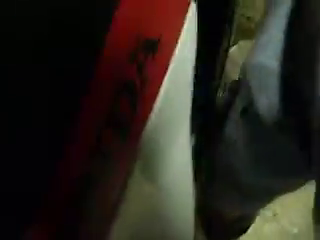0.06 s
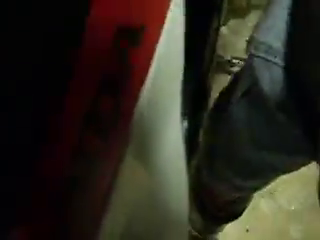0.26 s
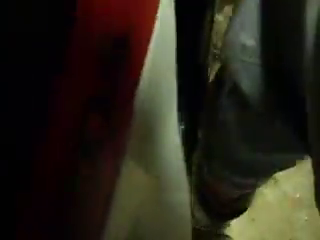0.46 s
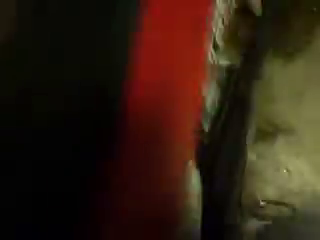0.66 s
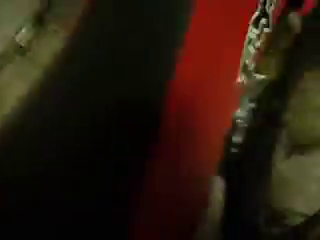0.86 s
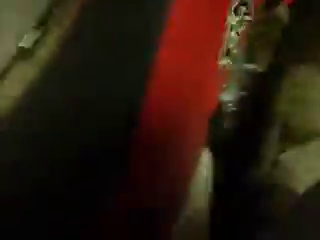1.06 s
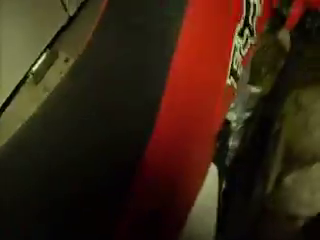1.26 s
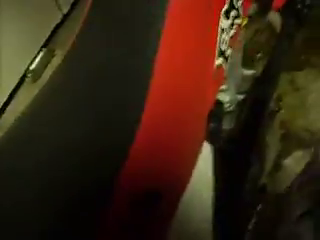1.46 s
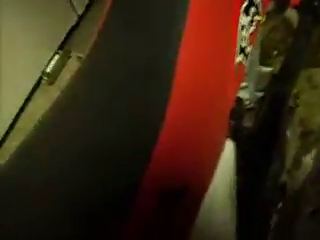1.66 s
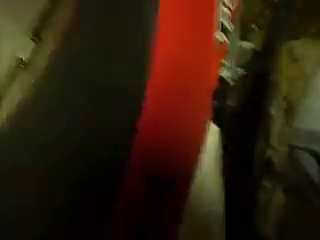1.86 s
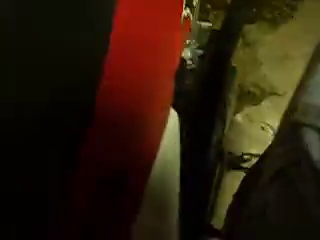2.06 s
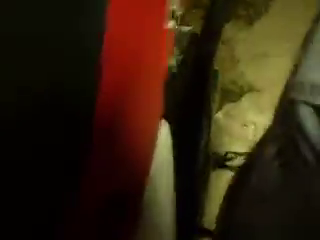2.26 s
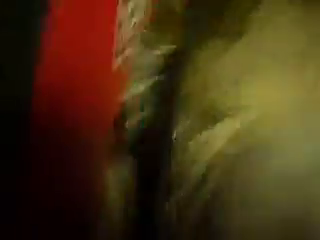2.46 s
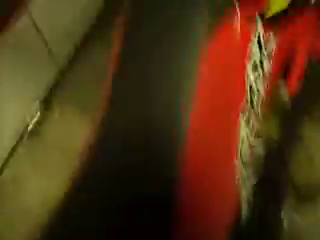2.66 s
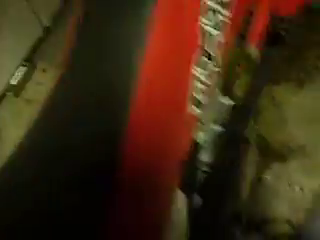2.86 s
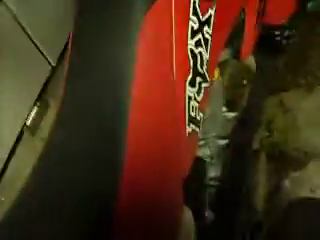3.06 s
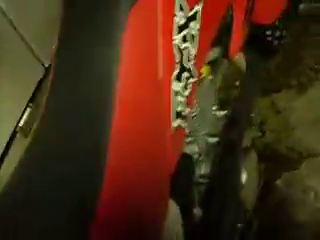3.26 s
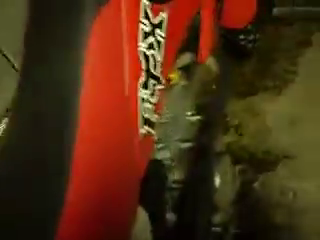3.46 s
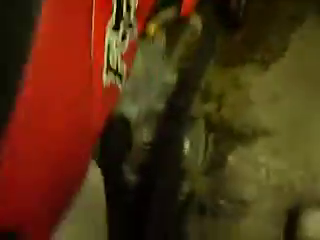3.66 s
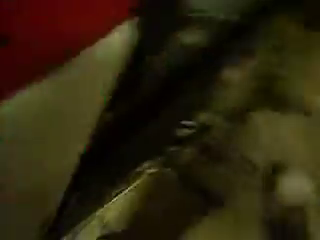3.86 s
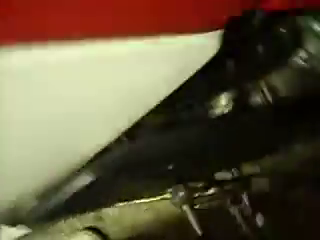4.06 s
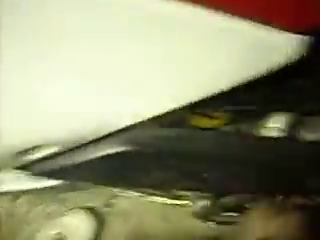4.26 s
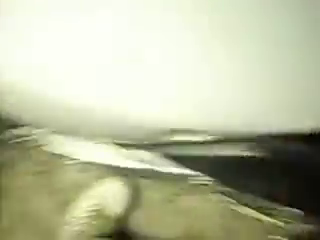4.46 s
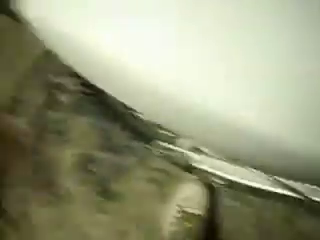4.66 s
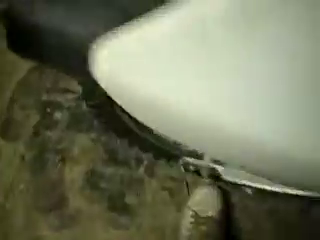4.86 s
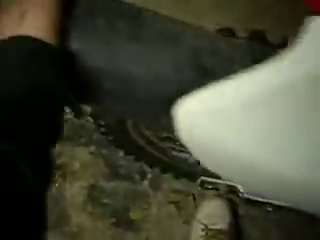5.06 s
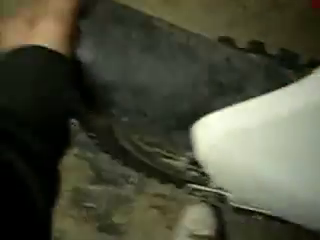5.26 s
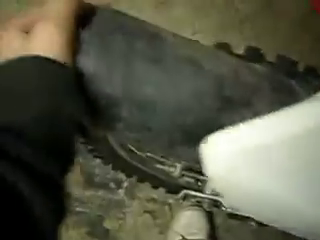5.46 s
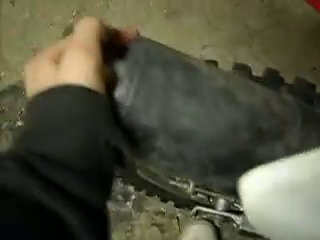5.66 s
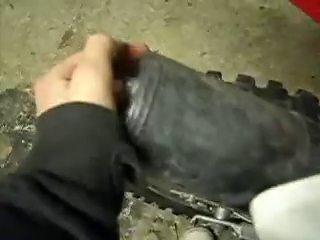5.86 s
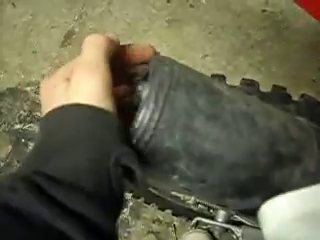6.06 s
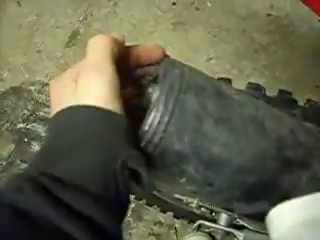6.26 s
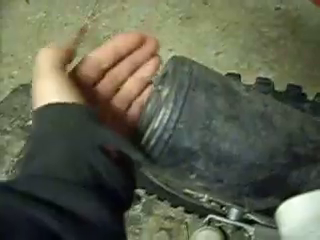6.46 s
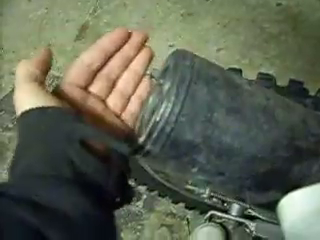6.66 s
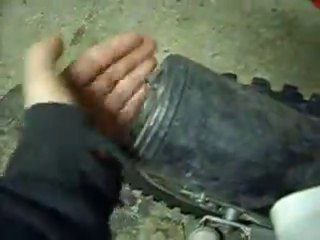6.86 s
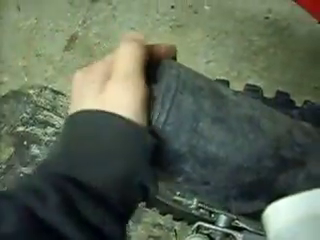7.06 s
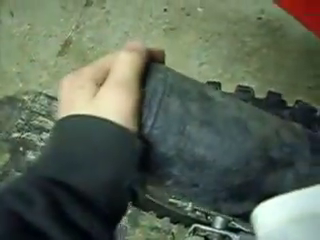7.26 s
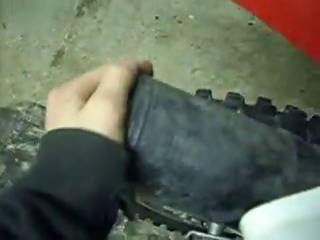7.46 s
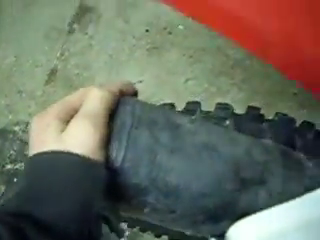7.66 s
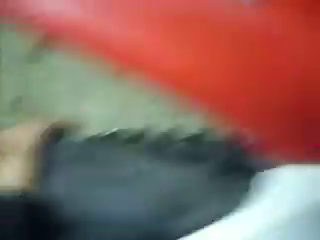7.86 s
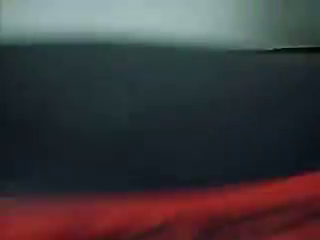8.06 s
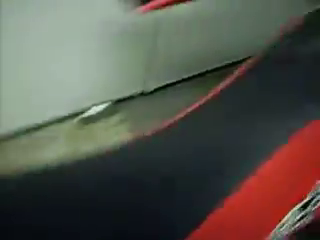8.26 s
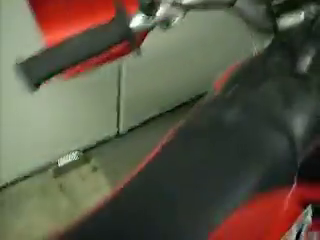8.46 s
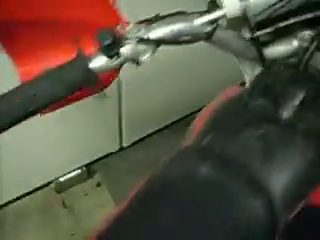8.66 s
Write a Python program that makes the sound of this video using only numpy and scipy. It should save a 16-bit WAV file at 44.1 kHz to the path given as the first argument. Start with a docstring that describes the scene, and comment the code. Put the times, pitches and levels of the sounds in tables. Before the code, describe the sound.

A kick lever scrapes and slams, a second kick catches, and a small single-cylinder dirt bike settles into a thumping idle in a closed garage.

```python
"""A small single-cylinder dirt bike is kicked into life in a closed garage, over room noise and a faint whine.
Small knocks and a hiss come first; the first kick scrapes the gears, puffs air and slams the lever on its stop.
The second kick catches: resonators ring at each exhaust pulse, noise bursts make gas rush and piston knock,
the starter ratchet rasps, and the engine picks up to about ten firings a second.
The microphone then moves from the seat to the silencer, where it crackles and flattens tall peaks, and back."""
import sys
import numpy as np
from scipy import signal
from scipy.fft import rfft, irfft, next_fast_len
from scipy.io import wavfile
from scipy.ndimage import uniform_filter1d

SR = 44100
rng = np.random.default_rng(int(sys.argv[2]) if len(sys.argv) > 2 else 0)


def store_pcm(level_fs):
    """Save levels as 16-bit WAV."""
    pcm = np.round(np.clip(level_fs, -1, 1) * 32767).astype(np.int16)
    wavfile.write(sys.argv[1], SR, np.atleast_2d(pcm).T)


N = 384552
TIME = np.arange(N) / SR
CATCH_S = 2.6535  # the engine starts firing


def from_db(db):
    """Turn decibels into a gain."""
    return 10 ** (np.asarray(db) / 20)


def rms_one(x):
    """Scale to rms 1."""
    return x / np.sqrt(np.mean(x ** 2) + 1e-20)


def curve(rows):
    """Join (time [s], value) rows by straight lines."""
    return np.interp(TIME, *np.transpose(rows))


def swell(start, end, rise_s, t60):
    """Rise from the start, hold until the end, die away."""
    rise = np.clip((TIME - start) / rise_s, 0, 1)
    return rise * from_db(-60 * np.clip((TIME - end) / t60, 0, 3))


def clicks(times, sizes):
    """Place one click of the given size at each time."""
    places = np.round(np.asarray(times) * SR).astype(int)
    return np.bincount(np.clip(places, 0, N - 1), sizes, N)


def grains(per_s, spread_db):
    """Scatter random clicks of uneven size."""
    sizes = rng.standard_normal(N) * from_db(spread_db * rng.standard_normal(N))
    return (rng.random(N) < per_s / SR) * sizes


def ring(x, hz, t60):
    """Let a unit click start a dying cosine of height 1; at 0 Hz a plain decay."""
    r = from_db(-60 / (t60 * SR))
    c = np.cos(2 * np.pi * hz / SR)
    return signal.lfilter([1, -r * c], [1, -2 * r * c, r * r], x + 1e-18)


def resonate(x, peaks):
    """Ring parallel resonances (Hz, width Hz, dB), scaled so that white noise keeps its level."""
    out, power = 0, 0
    for k, (hz, width, db) in enumerate(peaks):
        r = np.exp(-np.pi * width / SR)
        poles = [1, -2 * r * np.cos(2 * np.pi * hz / SR), r * r]
        band = (1 - r * r) / 2 * signal.lfilter([1, 0, -1], poles, x + 1e-18)
        out = out + (-1) ** k * from_db(db) * band  # alternate signs
        power += from_db(db) ** 2 * (1 - r * r) / 2
    return out / np.sqrt(power)


def colour(x, spectrum):
    """Give a steady white signal a spectrum that closes at both ends; rms 1."""
    size = next_fast_len(N, True)
    hz = np.maximum(np.fft.rfftfreq(size, 1 / SR), 1)
    points, db = np.transpose(spectrum)
    gain = from_db(np.interp(np.log(hz), np.log(points), db))
    gain = gain / (1 + (points[0] / hz / 2) ** 4) / (1 + (hz / points[-1] / 2) ** 4)
    return rms_one(irfft(rfft(x, size) * gain, size)[:N])


def noise(spectrum):
    """Make coloured noise of rms 1."""
    return colour(rng.standard_normal(N), spectrum)


def garage(x, wet_db):
    """Add dense, dying reflections from bare walls, starting a few milliseconds late."""
    garage_t60_s = 0.42
    t = TIME[:SR // 2]
    tail = rng.standard_normal(len(t)) * from_db(-60 * t / garage_t60_s) * (t > .004)
    reflections = signal.oaconvolve(x, tail / np.sqrt(np.sum(tail ** 2)))[:N]
    return x + from_db(wet_db) * reflections


# Spectrum of the quiet garage: (frequency [Hz], relative level [dB])
QUIET_COLOUR = [(15, -35), (25, 5), (84, -1.5), (118, -1.5), (169, -5.5), (259, -4.5), (1880, -23),
                (2620, -25.5), (3330, -29.5), (6820, -32.5), (7500, -48), (9750, -70), (16500, -120)]


def quiet_garage():
    """Steady low-weighted noise under a faint, high sine whine."""
    whine = from_db(-78) * np.sin(2 * np.pi * 6650 * TIME)
    return from_db(-54) * noise(QUIET_COLOUR) + whine


# Small knocks of boot, pedal and bodywork: (time [s], level [dB], pitch [Hz], t60 [s])
KNOCKS = [(0.02, -44.5, 130, 0.4), (0.022, -35, 478, 0.13), (.549, -42, 2370, 0.014),
          (.607, -35, 780, 0.043), (0.63, -27.5, 170, 0.11), (0.648, -32.5, 1230, 0.051),
          (0.653, -30, 308, 0.1), (0.942, -18.5, 195, 0.078), (0.956, -27.5, 360, 0.23),
          (1.186, -40, 680, 0.036), (1.64, -46.5, 700, 0.035), (1.786, -46, 257, 0.074),
          (2.453, -39, 450, 0.11), (2.459, -33.5, 99, 0.18), (2.499, -32, 3000, 0.0088),
          (2.614, -39, 1500, .02), (3.136, -34, 3800, 0.0065), (5.036, -31, 3420, 0.0033),
          (5.407, -32, 2300, 0.0048)]


def knocks():
    """Short dull contacts: each is a dying burst of noise in a broad band round its pitch."""
    spread = .27  # band edges lie at pitch / (1 + spread) and pitch * (1 + spread)
    out, t = np.zeros(N), TIME[:SR // 4]
    for s, db, hz, t60 in KNOCKS:
        edges = [hz / (1 + spread), hz * (1 + spread)]
        band = signal.butter(2, edges, "band", fs=SR, output="sos")
        settled = rms_one(signal.sosfilt(band, rng.standard_normal(SR // 2)))[-len(t):]
        attack = np.minimum(t * hz * 2, 1)  # half a period
        start = round(s * SR)
        out[start:start + len(t)] += settled * from_db(db - 60 * t / t60) * attack
    return garage(out, wet_db=-6.0)


# Spectrum shared by the hiss and the valve ticks: (frequency [Hz], relative level [dB])
HISS_COLOUR = [(1000, 10.5), (1900, -3), (2700, 8), (3500, -0.5), (5600, 4), (6500, -7.5), (7400, -24)]
# The hiss comes and goes: (start [s], end of hold [s], level [dB])
HISSES = [(.135, 0.199, -55.5), (.568, 1.198, -53.5), (2.387, 3.045, -53)]


def passing_hiss():
    """Coloured noise that swells quickly, holds and dies away."""
    level = sum(from_db(db) * swell(start, end, 0.0059, 0.15) for start, end, db in HISSES)
    return level * noise(HISS_COLOUR)


# Spectrum of the dragged gears: (frequency [Hz], relative level [dB])
SCRAPE_COLOUR = [(40, 16), (100, 6), (330, -0.5), (600, -9), (1100, -8), (1800, -41), (5000, -39.5)]
# The kicks drag the gears round: (start [s], end of stroke [s], level [dB])
KICKS = [(0.568, 0.962, -32.5), (2.375, 2.66, -34)]


def gear_scrape():
    """Under each stroke the gears grind: coloured random grains rise with the kick and run down after it."""
    strokes = sum(from_db(db) * swell(start, end, rise_s=0.24, t60=0.64) for start, end, db in KICKS)
    return strokes * colour(grains(per_s=1200, spread_db=2.0), SCRAPE_COLOUR)


def slug(pulses, width_s):
    """Shape each slug of gas as a pressure peak flanked by suction."""
    u = np.arange(-SR // 100, SR // 100 + 1) / (width_s * SR)
    shape = (1 - 3 * u ** 2) / (1 + u ** 2) ** 3 / (width_s * SR)
    return signal.oaconvolve(pulses, shape, "same")


# Air pumped out without firing: (time [s], level into the standing waves [dB])
PUFFS = [(0.76, -25.5), (1.009, -26), (2.555, -33), (2.654, -24)]
# Standing waves of pipe and garage; the exhaust scales the t60 for each place:
# (frequency [Hz], t60 [s], level at the seat [dB], level at the silencer [dB])
BOOM = [(56.7, 0.16, -23, 3.5), (82.3, 0.26, -9, 7), (85.84, 0.35, 6.5, 2), (142.6, 0.2, -7.5, 4.5),
        (170.5, 0.38, -6.5, 1.5), (195.8, 0.21, -4, -7.5), (244.1, 0.22, -5, 3), (277.5, 0.14, 6.5, 2.5),
        (312.3, 0.24, 6.5, 0), (379.6, .2, -7.5, -2.5), (416.6, 0.19, 1.5, -8.5), (467.6, 0.26, -2.5, 1.5),
        (511.6, 0.1, 4, 4), (572, 0.092, 0, -14.5)]


def pumped_air():
    """The turned engine pushes out soft, wide slugs of air that ring the standing waves, heard at the seat."""
    times, db = np.transpose(PUFFS)
    puffs = clicks(times, from_db(db))
    pumped = sum(from_db(seat_db) * ring(puffs, hz, t60) for hz, t60, seat_db, _ in BOOM)
    return slug(pumped, width_s=0.0056)


# Spectrum of the crash: (frequency [Hz], relative level [dB])
CRASH_COLOUR = [(90, 11), (200, 19), (420, 19), (650, 7), (1000, 1.5), (1800, 0.5), (2900, 1), (4200, -6),
                (6000, -5.5), (7300, -23)]
# Modes of frame and lever: (frequency [Hz], relative level [dB], t60 [s])
FRAME = [(89.5, -9, 0.18), (190, -10, 0.12), (372, 2.5, 0.28), (464, 4, 0.13), (870, -8.5, 0.17),
         (1186, -12, 0.15), (1640, -32, .2), (2010, -18, .1), (2840, -16, 0.19), (3350, -26, .07)]
# The lever hits its stop and rattles: (time [s], strength of the blow [dB])
LEVER = [(0.783, -17.5), (0.8, -38), (.858, -47.5), (0.888, -38.5)]


def lever_crash():
    """Each blow rings the frame modes and sets off noise with a fast and a slow decay."""
    times, db = np.transpose(LEVER)
    blows = clicks(times, from_db(db))
    frame = 0
    for k, (hz, mode_db, t60) in enumerate(FRAME):
        frame = frame + (-1) ** k * from_db(mode_db) * ring(blows, hz, t60)
    decay = from_db(4.0) * ring(blows, 0, 0.049) + from_db(-4.5) * ring(blows, 0, 0.37)
    return from_db(-5.0) * frame + noise(CRASH_COLOUR) * decay


# Engine speed before any drag; it picks up, then hunts: (time [s], speed [firings per s])
SPEED = [(2.65, 7.81), (3.14, 7.84), (3.22, 8.9), (3.77, 9.39), (3.83, 9.98), (4.57, 9.99), (4.82, 9.49),
         (4.95, 10.38), (5.58, 10.4), (6.22, 9.94), (6.53, 9.22), (6.87, 10.66), (7.71, 9.84),
         (7.81, 10.77), (7.98, 10.03)]
# Uneven, mostly weak burns, after which the crank drags:
# (time [s], share lost [cycles], weakening of the pulse [dB], negative is stronger)
STUMBLES = [(2.66, .43, 5), (3.33, 0.073, 2), (4.58, .05, -0.1), (5.18, 0.075, 1.5), (5.67, 0.081, 1.5),
            (6.48, 0.078, 1.5), (6.89, .06, -0.5), (7.87, 0.11, 5.5), (8.18, .07, 0.8)]


def crank():
    """Count engine cycles since the catch; each uneven burn costs part of a cycle."""
    drag_s = .07
    turned = np.cumsum(curve(SPEED)) / SR
    dragged = sum(lost * np.clip((TIME - s) / drag_s, 0, 1) for s, lost, _ in STUMBLES)
    return turned - np.interp(CATCH_S, TIME, turned) - dragged


# Strength of the exhaust pulses before the uneven burns: (time [s], level [dB])
PULSE = [(2.65, -19.5), (3.15, -16.5), (4.55, -12), (4.95, -9.0), (6.0, -8.5), (6.95, -10), (7.25, -13.5),
         (7.57, -14), (7.68, -10.5), (7.97, -11), (8.1, -13.5), (8.72, -16.0)]


def fire(cycles, near):
    """Fire once per cycle: times, exhaust pulse dB, and gas rush dB that follows it and grows near the silencer."""
    times = np.interp(np.arange(int(cycles[-1]) + 1), cycles, TIME)
    pulse_db = np.interp(times, *np.transpose(PULSE))
    for s, _, weaker_db in STUMBLES:
        pulse_db[np.argmin(np.abs(times - s))] -= weaker_db
    closeness = np.interp(times, TIME, near) ** 0.75
    uneven_db = 1.13 * rng.standard_normal(len(times))
    rush_db = pulse_db - 35.5 + 9 * closeness + uneven_db
    return times, pulse_db, rush_db


# Crankcase and cylinder resonances: (frequency [Hz], width [Hz], relative level [dB])
CASE = [(770, 130, 8), (1155, 91, -1), (2070, 68, -3.5), (2880, 440, -11.5), (6050, 200, -39)]


def piston_knock(times):
    """The piston knocks at each ignition, before the exhaust pulse: a noise burst rings the crankcase."""
    lead_s, knock_t60 = 0.018, 0.053
    sizes = from_db(rng.normal(0, 1.5, len(times)))
    bursts = ring(clicks(times - lead_s, sizes), 0, knock_t60) * rng.standard_normal(N)
    return resonate(bursts, CASE)


def valve_ticks(times):
    """A valve ticks a little over a quarter of the way through each cycle: a very short noise burst."""
    sizes = from_db(rng.normal(0, 1.5, len(times) - 1))
    ticks = clicks(times[:-1] + .28 * np.diff(times), sizes)
    return ring(ticks, 0, 0.01) * noise(HISS_COLOUR)


# Spectrum of the running chain and gears: (frequency [Hz], relative level [dB])
WHIRR_COLOUR = [(150, 18), (400, 31), (750, 16.5), (1200, 11), (1450, -3.5), (1900, 1), (2200, -3),
                (2900, -2), (4000, 1), (5300, -4), (6000, 0), (7200, -15)]
# Engine cases, rung by the cam chain: (frequency [Hz], width [Hz], relative level [dB])
CHAIN = [(1190, 60, -3.5), (2160, 48, 3), (2500, 70, -3.5), (3200, 130, -10.5), (6150, 350, -4)]


def cam_chain(times):
    """Dense grains whirr steadily; each power stroke snaps the chain tight and its grains ring the cases."""
    whirr = colour(grains(per_s=4600, spread_db=0.5), WHIRR_COLOUR)
    tension = ring(clicks(times, from_db(rng.normal(0, 1.5, len(times)))), 0, 0.34)
    chain = resonate(tension * grains(per_s=2100, spread_db=3.0), CHAIN)
    return from_db(-1) * (whirr + chain)


def engine_case(times, near):
    """Mix piston, valves and cam chain, loudest at the seat and shielded at the rear."""
    spin_up_s = 0.041  # full level is reached at the catch
    clatter = from_db(-0.5) * piston_knock(times) + from_db(1.0) * valve_ticks(times)
    spin_up = np.clip(1 + (TIME - CATCH_S) / spin_up_s, 0, 1)
    running = spin_up * from_db(-39.5 - 7.5 * near ** 2.9)
    return running * (cam_chain(times) + garage(clatter, wet_db=0.0))


# Spectrum of the gas rush: (frequency [Hz], relative level [dB])
RUSH_COLOUR = [(300, 14.5), (550, 17), (720, 7.5), (900, 8), (1250, 10.5), (1450, -1.5), (1900, 0.5),
               (2300, 4), (3300, -1), (4800, -1), (6100, 6), (7300, -15)]
# Throat of the pipe, voiced by turbulent gas: (frequency [Hz], width [Hz], relative level [dB])
THROAT = [(355, 56, 2.5), (518.5, 59, 1.5), (595, 82, -8), (820, 200, -18.5), (1164, 88, -13),
          (1246, 73, -18)]
# Sheet metal of the silencer, buzzing at each pulse: (frequency [Hz], width [Hz], relative level [dB])
SHELL = [(1160, 48, -2), (2206, 110, 6), (2398, 140, 8.5), (2800, 780, -1), (6280, 150, 3.5)]
# Crackle of the overloaded microphone at the front of each pulse:
# (frequency [Hz], width [Hz], relative level [dB])
CRACKLE = [(2440, 240, -1), (6330, 400, 0)]


def gas_rush(firings, near):
    """As the valve opens turbulent gas rushes, the microphone crackles, the shell buzzes and the throat barks."""
    times, pulse_db, rush_db = firings
    valve_lead_s, crackle_lead_s = 0.0038, 0.0027  # ahead of the exhaust pulse
    opening = uniform_filter1d(clicks(times - valve_lead_s, from_db(rush_db)), size=64)
    rush = ring(opening, 0, 0.2) * noise(RUSH_COLOUR) * from_db(8.0 - 5.56 * near)
    flow = ring(uniform_filter1d(clicks(times, from_db(pulse_db)), size=128), 0, 0.21)
    bark = flow * resonate(rng.standard_normal(N), THROAT) * from_db(-12.5 - 6 * near)
    # buzz and crackle are sharp only from close by
    shaken = ring(opening, 0, 0.087) * rng.standard_normal(N)
    buzz = resonate(shaken, SHELL) * from_db(-3.5 + 10.1 * near)
    front = ring(clicks(times - crackle_lead_s, from_db(rush_db)), 0, 0.0075)
    crackle = resonate(front * rng.standard_normal(N), CRACKLE) * from_db(-2 + 9.8 * near)
    return rush + bark + garage(buzz + crackle, wet_db=-19.5)


def exhaust(firings, near):
    """Pulses ring pipe and garage; at the seat the upper waves arrive later and all of them last longer."""
    times, pulse_db, _ = firings
    seat_ring, silencer_ring = 1.21, 0.8  # factors on the t60
    place = np.interp(times, TIME, near)
    boom, late_s = 0, 0
    for hz, t60, seat_db, silencer_db in BOOM:
        # no two burns are alike, least of all in the high modes
        uneven_db = 3.5 * np.sqrt(hz / BOOM[-1][0]) * rng.standard_normal(len(times))
        sizes = from_db(pulse_db + uneven_db)
        late_s += 0.002173 * (hz > 300)  # short waves come round by the walls, each mode later
        # at the seat the upper modes follow the strength of the burn more than in proportion
        hard_db = 0.82 * (pulse_db + 15) * (hz > 220)
        at_seat = clicks(times + late_s, sizes * (1 - place) * from_db(seat_db + hard_db))
        at_silencer = clicks(times + late_s / 2, sizes * place * from_db(silencer_db))
        boom = boom + ring(at_seat, hz, t60 * seat_ring) + ring(at_silencer, hz, t60 * silencer_ring)
    # close to the outlet the slug itself is heard, before any ringing
    direct = slug(clicks(times, place * from_db(pulse_db - 48) * SR), width_s=0.003)
    return slug(boom, width_s=0.0023) + direct


# Spectrum of the ratchet: (frequency [Hz], relative level [dB])
RASP_COLOUR = [(700, 9), (1600, -1), (2500, 4.5), (3500, 0.5), (4700, 3), (6300, -2.5), (7400, -24)]


def starter_ratchet(cycles):
    """The ratchet runs over the gear from the catch until the lever comes back; each tooth snaps, then fades."""
    lever_back_s, teeth_per_cycle, tooth_depth_db = 3.0, 7, 12
    tooth_db = tooth_depth_db * (1.0 - cycles * teeth_per_cycle % 1)
    level = swell(CATCH_S, lever_back_s, rise_s=0.0044, t60=0.098) * from_db(-49.5 + tooth_db)
    rasp = level * colour(grains(per_s=4700, spread_db=2.5), RASP_COLOUR)
    return garage(rasp, wet_db=-6)


# Path of the microphone: (time [s], place [0 at the seat .. 1 at the silencer])
PLACE = [(2.65, 0.0086), (4.35, 0.05), (4.72, 0.62), (5.0, 0.79), (6.9, 0.98), (7.4, 0.73), (7.9, 0.72),
         (8.35, 0.072)]


def scene():
    """Mix the quiet garage, the kicks and the running engine into one channel."""
    near = np.clip(curve(PLACE), 0, 1)
    cycles = crank()
    firings = fire(cycles, near)
    background = quiet_garage() + knocks() + passing_hiss()
    kicks = gear_scrape() + lever_crash() + starter_ratchet(cycles)
    # the garage is heard less from close to the silencer
    pipe = garage(pumped_air() + exhaust(firings, near), wet_db=-12 - 3.5 * near)
    engine = engine_case(firings[0], near) + gas_rush(firings, near) + pipe
    return (background + kicks + engine)[None]


def record(dry):
    """The microphone flattens the tallest peaks; a steep low-pass cuts the top."""
    overload, cutoff_hz = .69, 7500  # overload is the ceiling in full-scale units
    flattened = dry / (1 + np.abs(dry / overload) ** 24) ** (1 / 24)
    low_pass = signal.ellip(8, .5, 70, cutoff_hz, fs=SR, output="sos")
    return signal.sosfilt(low_pass, flattened)


dry = scene()
out = record(dry)
store_pcm(out)
```